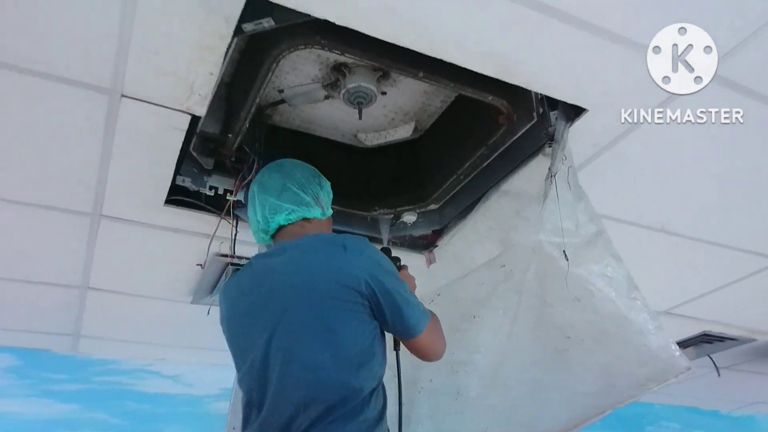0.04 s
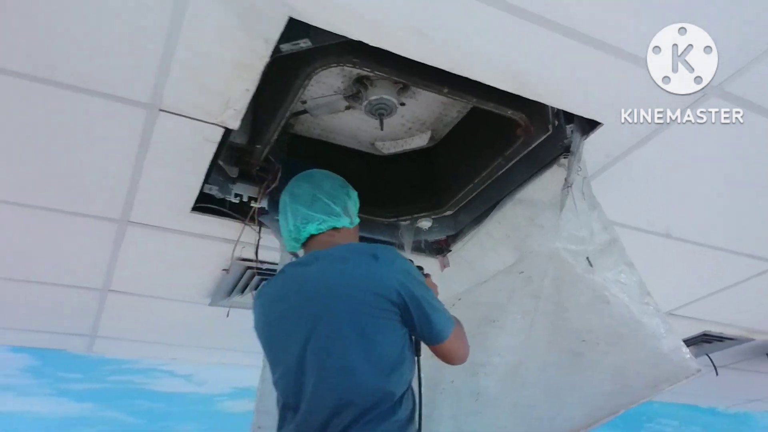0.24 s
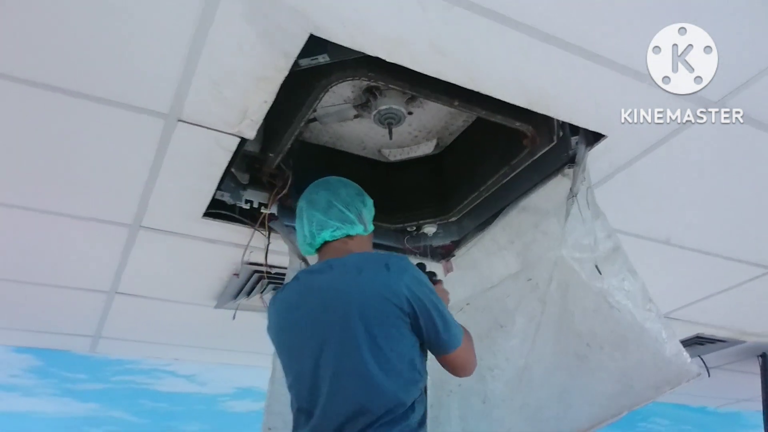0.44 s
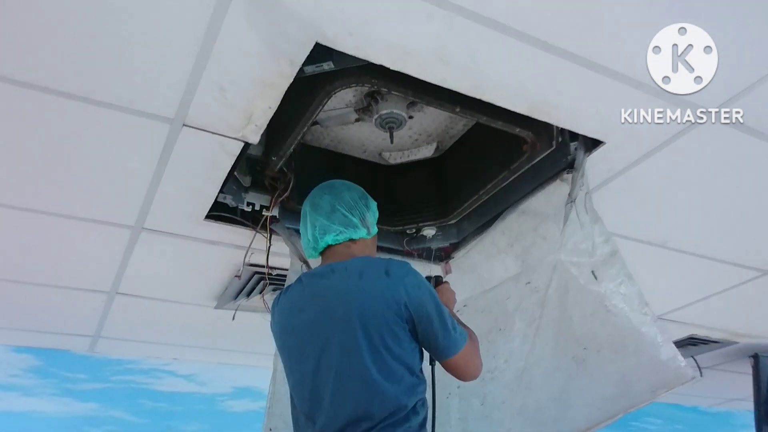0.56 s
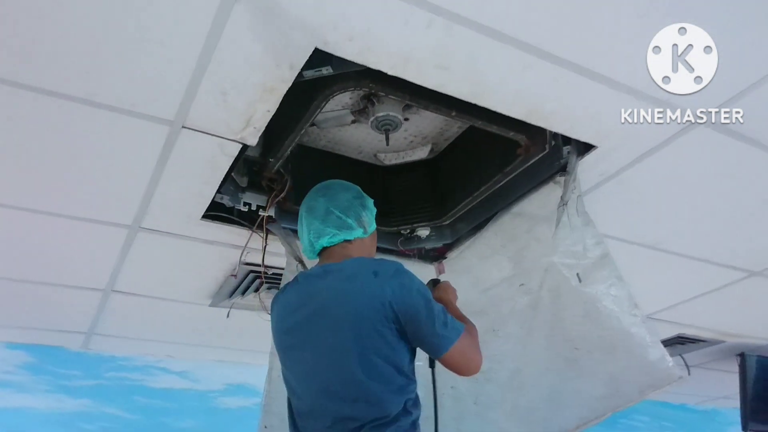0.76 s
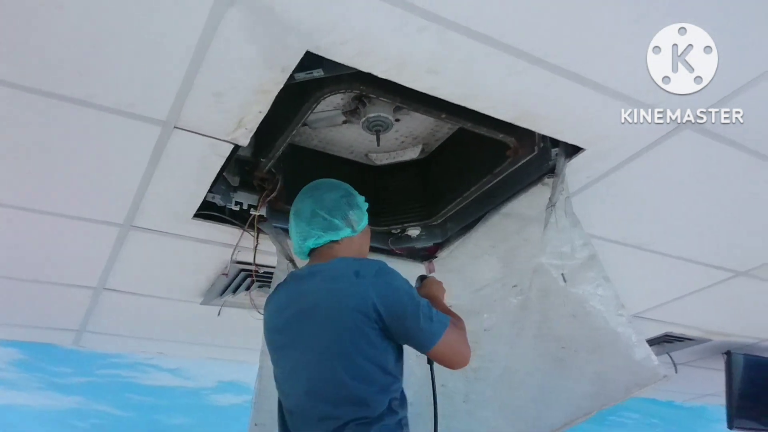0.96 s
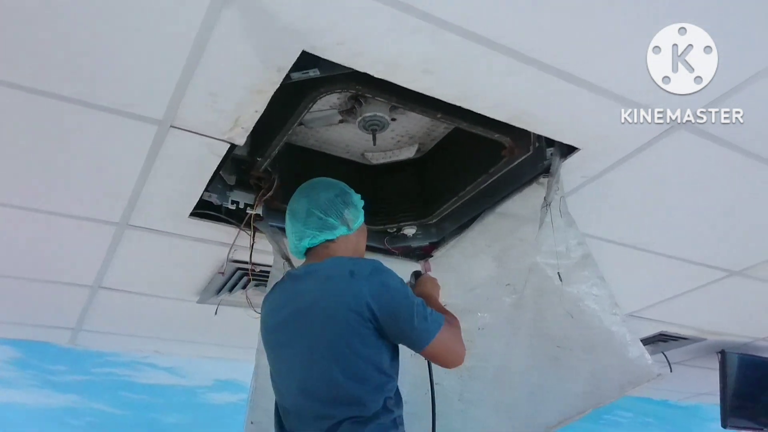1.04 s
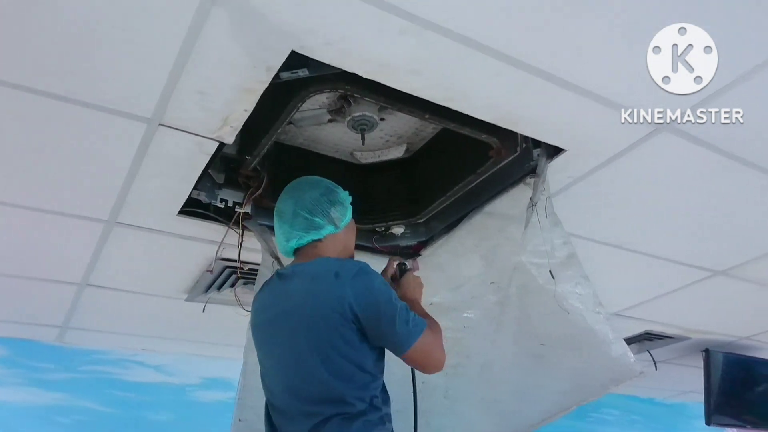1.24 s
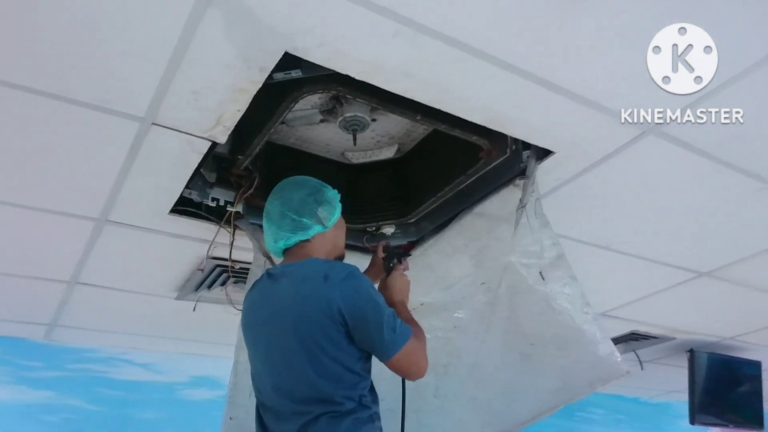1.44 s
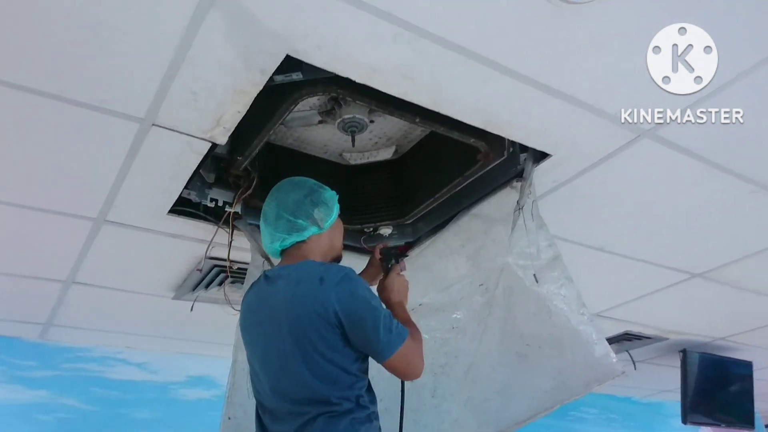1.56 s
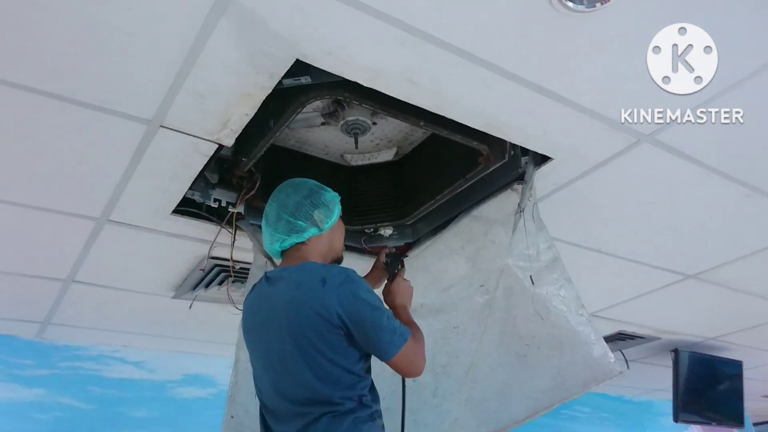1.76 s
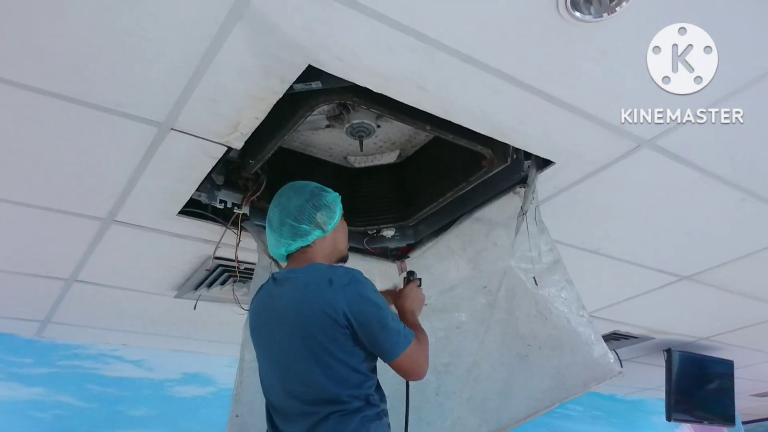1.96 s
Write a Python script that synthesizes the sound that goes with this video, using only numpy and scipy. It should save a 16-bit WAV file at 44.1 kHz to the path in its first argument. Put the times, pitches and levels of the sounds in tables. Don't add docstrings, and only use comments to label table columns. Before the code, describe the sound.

Pressure washer jet hisses on a ceiling coil, dies as the pump stops, then surges back

```python
import sys
import numpy as np
from scipy import signal
from scipy.fft import rfft, irfft, next_fast_len
from scipy.io import wavfile
from scipy.ndimage import uniform_filter1d, map_coordinates

SR = 44100
rng = np.random.default_rng(int(sys.argv[2]) if len(sys.argv) > 2 else 0)


def log_audio(samples):
    frames = np.atleast_2d(samples).T
    limited = np.clip(frames, -1, 1)
    pcm = np.round(limited * 32767).astype(np.int16)
    wavfile.write(sys.argv[1], SR, pcm)


def gain_from_db(level_db):
    decades = np.asarray(level_db, float) / 20
    return 10 ** decades


N = 88464
SHAFT_HZ = 48.3


def unit(x):
    return x / np.sqrt(np.mean(x ** 2) + 1e-20)


def along(points, hz):
    f, v = np.transpose(points)
    return np.interp(np.log(hz + 1), np.log(f + 1), v)


def curve(rows):
    return np.interp(np.arange(N) / SR, *np.transpose(rows))


def wobble(rate):
    knots = rng.standard_normal(int(N * rate / SR) + 4)
    return map_coordinates(knots, [np.arange(N) * rate / SR])


def filtered(x, response):
    m = next_fast_len(N + SR // 2)
    return irfft(rfft(x, m) * response(np.fft.rfftfreq(m, 1 / SR)), m)[..., :N]


def ringing(body):
    def response(f):
        return sum((-1) ** k * gain_from_db(db) * 1j * f * width / (centre ** 2 - f * f + 1j * f * width)
                   for k, (centre, width, db) in enumerate(body))
    return response


def rush(spectrum, patchy_db, spiky_db):
    # (frequency [Hz], likeness [0-1])
    likeness = [(60, 0.65), (180, 0.77), (550, 0.9), (1650, 0.042), (4970, 0.057), (15000, 0.016)]
    spiky = rng.standard_normal((2, N)) * gain_from_db(spiky_db * wobble(1500))
    z = signal.stft(spiky, nperseg=512)[2]
    patches = uniform_filter1d(rng.standard_normal(z.shape[1:]), 6, 0)
    patches = uniform_filter1d(patches, 8, 1)
    pair = signal.istft(z * gain_from_db(patchy_db * unit(patches)), nperseg=512)[1][:, :N]

    def mid_side(hz):
        angle = np.arccos(np.clip(along(likeness, hz), -1, 1)) / 2
        return gain_from_db(along(spectrum, hz)) * np.array([np.cos(angle), np.sin(angle)])

    mid, side = filtered(pair, mid_side)
    return np.array([mid + side, mid - side]) / np.sqrt(np.mean(mid ** 2))


def jet():
    # (time [s], strength [dB])
    jet_strength = [(0, -40.5), (.385, -40), (.42, -45), (.485, -47.5), (.515, -41.5), (.58, -42.5),
                    (.68, -48.5), (.8, -57), (1, -67.5), (1.25, -74.5), (1.44, -77.5), (1.55, -61),
                    (1.59, -55), (1.692, -53.5), (1.703, -41.5), (1.79, -43), (1.92, -52.5), (2.01, -61.5)]
    # (time [s], level [dB])
    gun_aim = [(0, 1.5), (.4, 1), (.5, -3), (.6, -6), (.75, -4), (.85, -2), (1.4, 3), (1.46, 5), (1.55, 4),
               (1.66, 8), (1.71, -5), (1.8, -5), (1.9, -3), (2.01, -6)]
    # (frequency [Hz], level [dB])
    hiss_tone = [(1500, -19), (2600, -5.5), (3300, -6), (4000, -4.5), (4450, -6), (4770, -4), (5100, -6.5),
                 (5700, -5.5), (6300, -15.5), (9000, -33.5)]
    # (frequency [Hz], level [dB])
    fizz_tone = [(3650, -35), (6200, -5.5), (6960, -5), (7700, 0), (8560, 2), (9700, -9.5), (12600, -38),
                 (21300, -120)]
    # (frequency [Hz], level [dB])
    mist_tone = [(9000, -15), (9700, -6), (10300, -12.5), (10900, -6), (11700, -13.5), (13000, -6.5),
                 (14900, 2.5), (15600, -2)]
    t = np.arange(N) / SR
    strength_db = curve(jet_strength)
    peak_db = strength_db.max()
    below_db = strength_db - peak_db
    beat_db = 0.35 * np.sin(2 * np.pi * 2 * SHAFT_HZ * t) + 1.35 * wobble(10.4)
    hiss = gain_from_db(6 + 0.88 * below_db + beat_db) * rush(hiss_tone, patchy_db=1.5, spiky_db=2.2)
    fizz = gain_from_db(1.125 * below_db + beat_db) * rush(fizz_tone, patchy_db=1.2, spiky_db=1.5)
    mist_db = 1.94 * below_db + curve(gun_aim) + beat_db
    mist = gain_from_db(mist_db) * rush(mist_tone, patchy_db=2.5, spiky_db=1.5)
    return gain_from_db(peak_db) * (hiss + fizz + mist)


def casing_roar():
    # (time [s], strength [dB])
    roar_strength = [(0, -33.5), (.42, -32), (.48, -35), (.52, -33), (.6, -37), (.68, -41.5), (.79, -43),
                     (1, -51), (1.15, -52), (1.27, -62.5), (1.43, -52), (1.56, -40.5), (1.59, -31.5),
                     (1.65, -31), (1.72, -31), (1.84, -36.5), (1.92, -39), (2.01, -38.5)]
    # (frequency [Hz], level [dB])
    roar_tone = [(140, -14.5), (230, -19.5), (409, -1), (584, -4), (671, -2), (1100, -5), (1280, -8.5),
                 (1800, -4.5), (3600, -12.5), (4680, -34.5), (7920, -120)]
    # (frequency [Hz], width [Hz], level [dB])
    panels = [(740, 98, -1), (1070, 53, 1), (1418, 24, 0), (1850, 28, -1), (2067, 41, -3.5),
              (4220, 160, -0.5), (5650, 280, 6)]
    drumming = rush(roar_tone, patchy_db=1.5, spiky_db=1.5)
    panel_ring = filtered(drumming, lambda f: np.abs(ringing(panels)(f)))
    drumming = drumming + 0.52 * unit(panel_ring)
    return gain_from_db(curve(roar_strength) + 0.49 * wobble(20.74)) * drumming


def motor_whine():
    multiples = [8, 9, 12, 14, 15, 16, 17, 18, 19, 20, 23, 29, 30, 33, 35, 36, 37, 38, 40, 56, 70, 80, 81,
                 82, 83, 99]
    # (level [dB], left-right [dB], growth as load builds [dB/s])
    order_levels = [(-15.5, -3, -12), (-8, -1, 10), (-16, -3, -8), (-19, -7, -9), (-3, 2.5, 37),
                    (0, 2.5, -21), (-4, -1, 1), (-9, -5, 14), (-3.5, -4, 7), (-9, 14, 14), (-16.5, 5, 4),
                    (-8.5, 1.5, 5), (-10.5, -1.5, -6), (-17.5, -1, -11), (-19.5, -3, -3), (-13, -7, 3),
                    (-11, -7.5, 2), (-12.5, 2, -1), (-17, -8, 3), (-14.5, 21, -9), (-12.5, 12, 3),
                    (-18.5, -10, -12), (-18, -4, 24), (-15.5, 10, -9), (-20, -5, 24), (-19, -12.5, 11)]
    off_s, stop_s, t60_s = 0.39, 0.088, 1
    load_at_s, load_rise_s, stroke_s = 0.18, 0.066, 0.331
    t = np.arange(N) / SR
    after = np.maximum(t - off_s, 0)
    load = off_s / 3 * np.tanh((t - load_at_s) / load_rise_s)
    fade = gain_from_db(-31.5 - 3.5 * np.minimum(after / stop_s, 1) - 60 * after / t60_s)
    lines = 0
    for k, (db, pan_db, db_per_s) in zip(multiples, order_levels):
        pan = np.array([[pan_db / 2], [-pan_db / 2]])
        strength = gain_from_db(db + db_per_s * load + 1.1 * wobble(3.0) + pan)
        cycles = k * SHAFT_HZ * (t - stroke_s) + k % 2 / 4 + 0.09 * rng.normal() + 0.05 * wobble(6)
        left_shift = np.array([[0.6], [0]]) * rng.normal()
        lines = lines + strength * np.cos(2 * np.pi * cycles + left_shift)
    return np.sqrt(2) * fade * lines


def pump_churn():
    # (frequency [Hz], level [dB])
    churn_tone = [(35, -28), (65, -2), (110, -1), (170, -13), (280, 1.5), (330, 7.5), (480, 3), (800, -29)]
    off_s, t60_s = 0.42, 0.6
    after = np.maximum(np.arange(N) / SR - off_s, 0)
    return gain_from_db(-39 - 60 * after / t60_s) * rush(churn_tone, patchy_db=-0.5, spiky_db=-4.5)


def mains_hum():
    # (start [s], end [s], level [dB])
    hum_spans = [
        (0.043, 0.264, -45.5),
        (0.353, 0.592, -44.5),
        (1.666, 1.78, -44.5),
    ]
    hum_hz, edge_s = 198.4, 0.067
    t = np.arange(N) / SR
    on = sum(gain_from_db(db) * np.clip(np.minimum(t - start, end - t) / edge_s + 1, 0, 1) ** 2
             for start, end, db in hum_spans)
    tone = np.sin(2 * np.pi * (hum_hz * t + 0.08 * wobble(12)))
    return np.sqrt(2) * on * gain_from_db(2.2 * wobble(14)) * tone


def knocks(events, body, attack_s, spiky_db, dull_hz=6100):
    t = np.arange(N) / SR
    shape = sum(gain_from_db(db - 20 * np.maximum(t - start, 0) / length) * np.clip((t - start) / attack_s, 0, 1)
                for start, db, length in events)
    rattle = unit(rng.standard_normal(N) * gain_from_db(spiky_db * wobble(900)))

    def heard(f):
        return ringing(body)(f) / (1 + (f / dull_hz) ** 20)

    return filtered(shape * rattle, heard) / np.std(filtered(rattle, heard))


def valve_clacks():
    # (time [s], level [dB], length [s])
    clacks = [
        (.794, -28, .075),
        (.853, -37, .035),
        (1.353, -42, .045),
        (1.699, -36, .02),
    ]
    # (frequency [Hz], width [Hz], level [dB])
    valve_modes = [(720, 300, -1), (1050, 400, 0), (1500, 300, -2), (2050, 500, 0), (2550, 500, -3),
                   (3650, 400, -9), (5600, 500, -11)]
    return knocks(clacks, valve_modes, attack_s=0.0045, spiky_db=2.5, dull_hz=6500)


def hose_thuds():
    # (time [s], level [dB], length [s])
    thuds = [
        (1.045, -31, 0.04),
        (1.09, -44, 0.023),
        (1.295, -35.5, 0.044),
        (1.438, -34, 0.11),
        (1.458, -32, 0.095),
        (1.53, -32, 0.14),
        (1.95, -37, 0.034),
    ]
    # (frequency [Hz], width [Hz], level [dB])
    casing_modes = [(310, 70, -2), (440, 50, 0), (590, 60, 0), (720, 120, -2), (980, 200, -5)]
    return knocks(thuds, casing_modes, attack_s=0.018, spiky_db=1.5)


def nozzle_spits():
    # (time [s], level [dB], length [s])
    spits = [
        (1.441, -45, .05),
        (1.459, -41.5, .035),
    ]
    # (frequency [Hz], width [Hz], level [dB])
    nozzle_modes = [(4700, 260, 0), (2200, 1200, -6), (4200, 400, -3)]
    return knocks(spits, nozzle_modes, attack_s=0.005, spiky_db=2.0, dull_hz=5000)


def fin_sweeps():
    # (time [s], level [dB], length [s])
    sweeps = [
        (1.555, -41.5, 0.4),
        (1.7, -42, 0.14),
        (1.75, -48, 0.13),
    ]
    # (frequency [Hz], width [Hz], level [dB])
    fin_modes = [(4130, 380, -4), (5630, 210, -8.5)]
    return knocks(sweeps, fin_modes, attack_s=0.028, spiky_db=2.0)


def pan_gurgles():
    # (time [s], level [dB], length [s])
    gurgles = [
        (1.048, -39, 0.039),
        (1.09, -44, 0.034),
        (1.356, -47, .05),
        (1.585, -35, 0.11),
    ]
    # (frequency [Hz], width [Hz], level [dB])
    pan_modes = [(1000, 210, -5), (1450, 150, 2), (1980, 460, -2.5), (2500, 220, -2)]
    return knocks(gurgles, pan_modes, attack_s=0.01, spiky_db=1.0)


def air_whistles():
    # (time [s], level [dB], length [s])
    whistles = [
        (1.448, -71, .2),
        (1.15, -84, .04),
    ]
    # (frequency [Hz], width [Hz], level [dB])
    tip_modes = [(9100, 900, -5), (14800, 720, 1)]
    leak = knocks(whistles, tip_modes, attack_s=0.006, spiky_db=1.5, dull_hz=16000)
    return filtered(leak, lambda f: f > 7500)


def water_slumps():
    # (time [s], level [dB], length [s])
    slumps = [
        (.65, -48.5, 0.29),
        (.8, -50, 0.12),
        (1.5, -46, 0.23),
    ]
    # (frequency [Hz], width [Hz], level [dB])
    sheet_modes = [(148, 62, -1.5), (198, 42, 0), (299, 35, 0)]
    return knocks(slumps, sheet_modes, attack_s=0.023, spiky_db=2.5)


def pump_swell():
    # (frequency [Hz], level [dB])
    swell_tones = [(64.6, -46), (98, -45.5)]
    peak_s, rise_s, fall_s, in_step_s = 1.544, 0.07, 0.078, 1.533
    t = np.arange(N) / SR
    swell = np.exp(-((t - peak_s) / np.where(t < peak_s, rise_s, fall_s)) ** 2)
    modes = sum(gain_from_db(db) * np.cos(2 * np.pi * hz * (t - in_step_s)) for hz, db in swell_tones)
    return np.sqrt(2) * swell * modes


def room(x):
    # (frequency [Hz], decay time t60 [s])
    decay_times = [(200, 0.5), (1500, 1.7), (5000, 0.55), (12000, 1.66)]
    hz, t, z = signal.stft(rng.standard_normal((2, SR)), SR, nperseg=256)
    decay = gain_from_db(-60 * t / along(decay_times, hz)[:, None])
    tail = signal.istft(z * decay, SR, nperseg=256)[1]
    late = np.pad(x, (300, 0))[None]
    return signal.fftconvolve(late, tail / np.linalg.norm(tail[0]), axes=1)[:, :N]


def background():
    # (frequency [Hz], level [dB])
    fan_tone = [(25, -65), (40, -45), (62, -3), (110, -3.5), (160, -10), (300, -11.5), (450, -4),
                (700, -27), (1500, -120)]
    # (frequency [Hz], level [dB])
    murmur_tone = [(400, -3), (550, 24.5), (1100, 10), (2400, 11), (3800, -25), (4600, -29), (5500, -17),
                   (6400, -20), (9500, -23), (10500, -120)]
    drone_hz, throb_hz, throb_peak_s = 60.2, 6.08, 0.354
    t = np.arange(N) / SR
    drone = gain_from_db(-52) * np.sqrt(2) * np.sin(2 * np.pi * (drone_hz * t + 0.25 * wobble(18)))
    throb = gain_from_db(3.5 * np.cos(2 * np.pi * throb_hz * (t - throb_peak_s)))
    air = gain_from_db(-51.5) * rush(fan_tone, patchy_db=1.5, spiky_db=0.1)
    murmur = gain_from_db(-53) * rush(murmur_tone, patchy_db=1.5, spiky_db=0.1)
    return throb * drone + air + murmur


def scene():
    hits = valve_clacks() + hose_thuds() + nozzle_spits()
    hits = hits + fin_sweeps() + pan_gurgles() + air_whistles()
    water = jet() + casing_roar() + water_slumps()
    pump = motor_whine() + pump_churn() + mains_hum()
    return water + pump + pump_swell() + hits + gain_from_db(-1.5) * room(hits) + background()


def roll_off(x):
    return signal.sosfilt(signal.butter(12, 16540, fs=SR, output="sos"), x)


def record(dry):
    # (frequency [Hz], left-right [dB])
    port_balance = [(60, -12.5), (130, -18), (290, -9.5), (640, -6.5), (1410, -13.5), (3100, -15),
                    (6820, -4), (15000, -4)]
    # (frequency [Hz], width [Hz], level [dB])
    capsule_modes = [(3990, 240, 0), (5470, 230, 1)]
    top_hz, edge_hz, low_cut_hz = 15600, 150, 42

    def colour(hz):
        ports = gain_from_db(along(port_balance, hz) / 2 * np.array([[1], [-1]]))
        capsule = 1 + np.abs(ringing(capsule_modes)(hz)) ** 2
        band_limit = np.clip((top_hz - hz) / edge_hz, 0, 1) / (1 + (low_cut_hz / (hz + 1)) ** 6)
        return ports * capsule * band_limit

    mix = filtered(dry, colour)
    return roll_off(mix)


dry = scene()
out = record(dry)
log_audio(out)
```